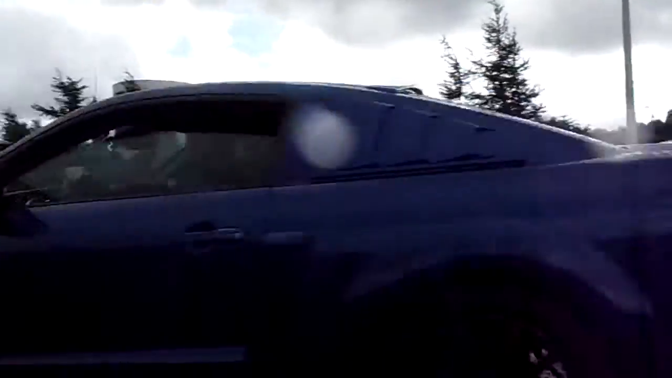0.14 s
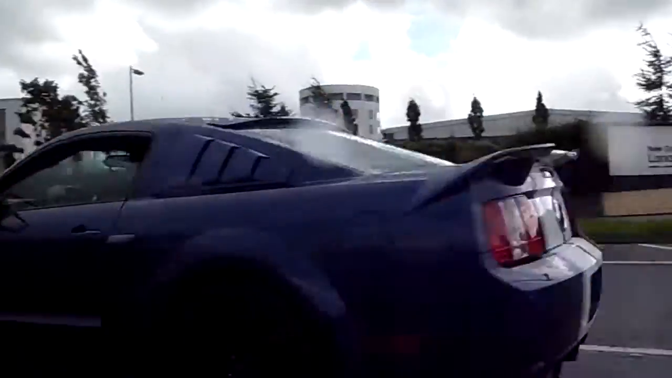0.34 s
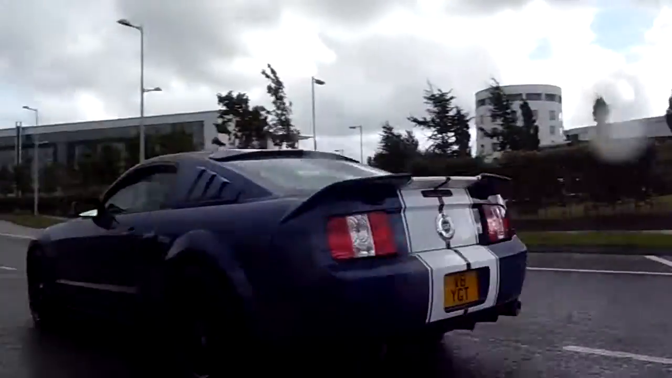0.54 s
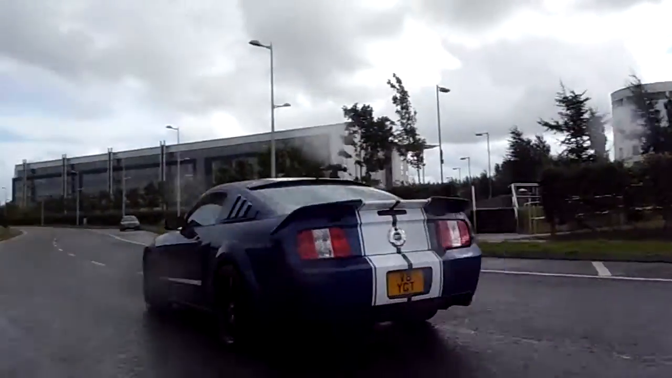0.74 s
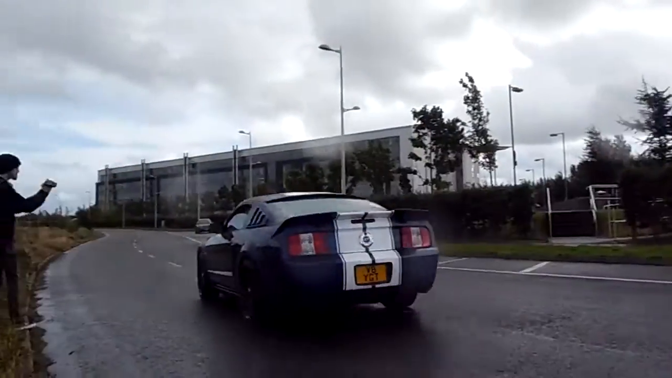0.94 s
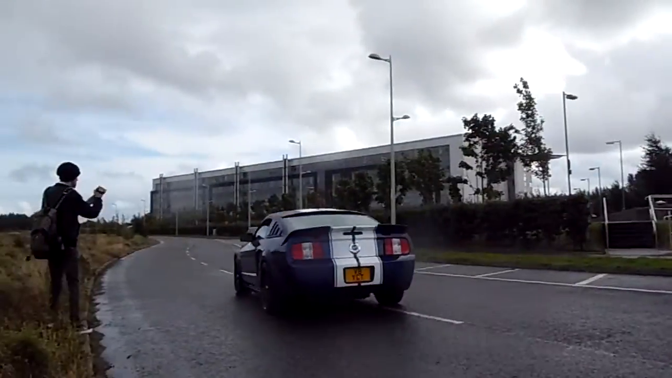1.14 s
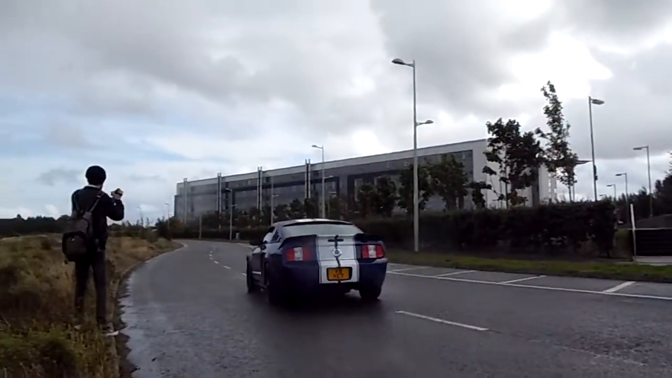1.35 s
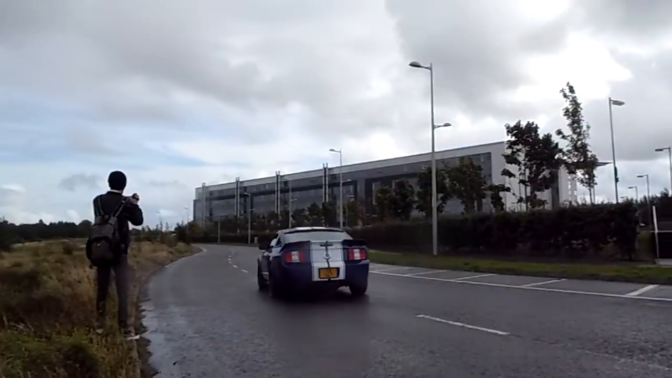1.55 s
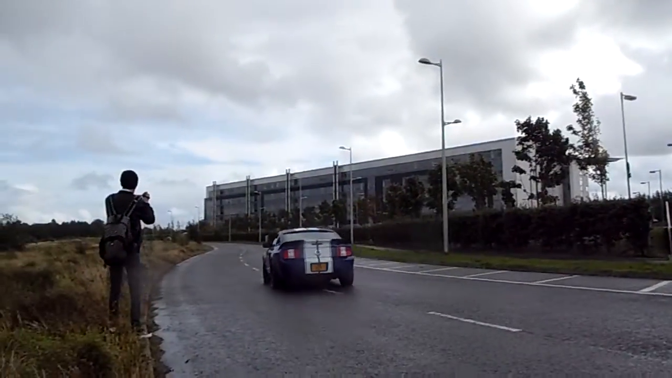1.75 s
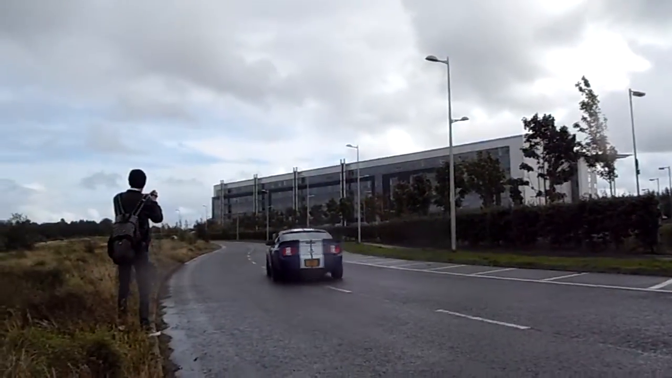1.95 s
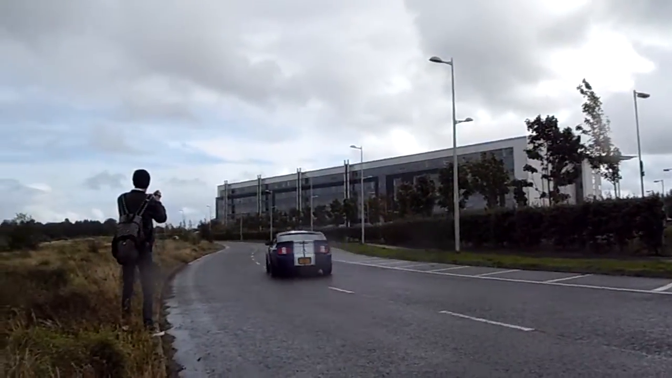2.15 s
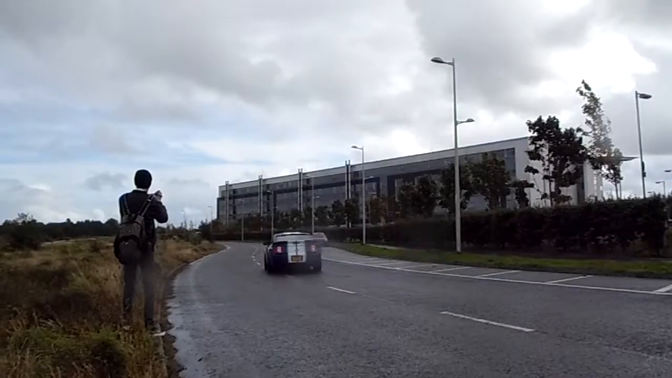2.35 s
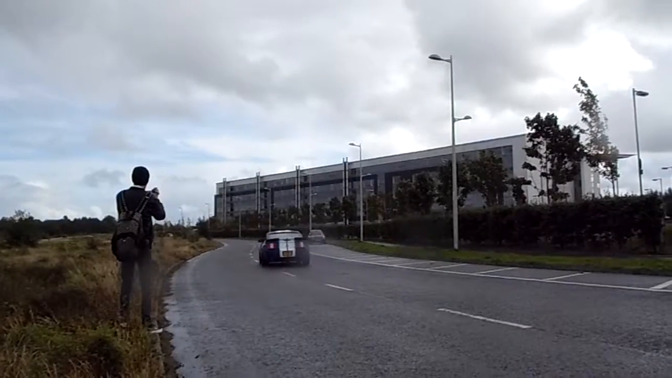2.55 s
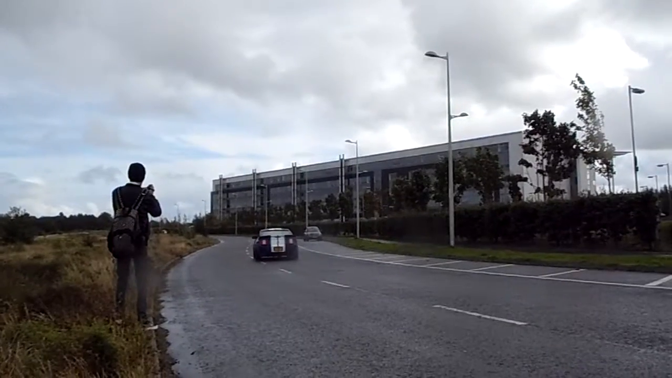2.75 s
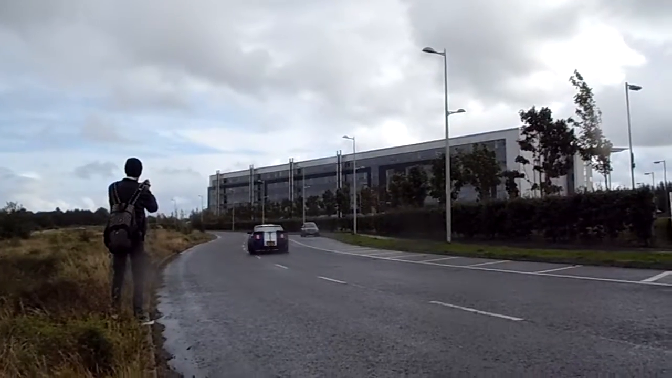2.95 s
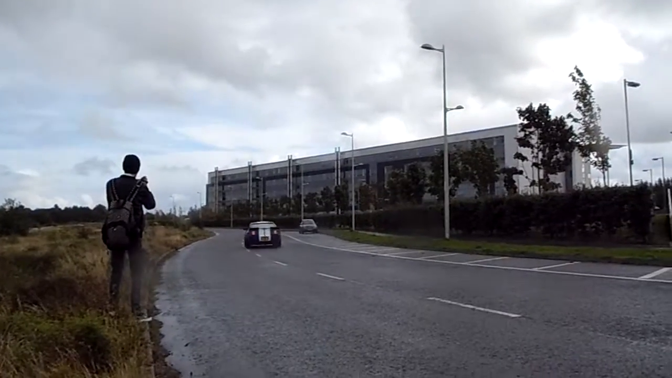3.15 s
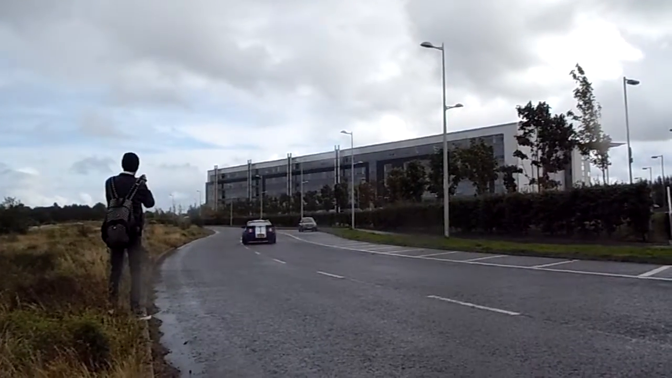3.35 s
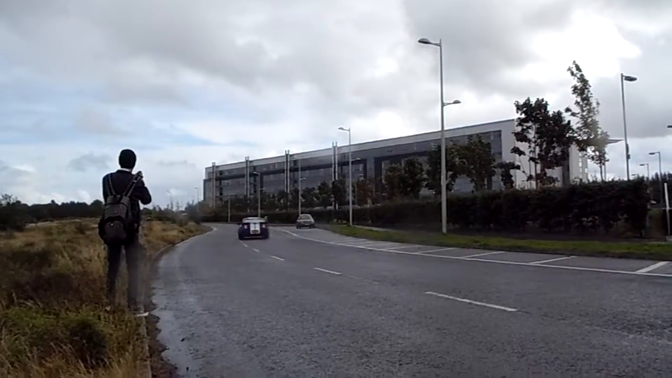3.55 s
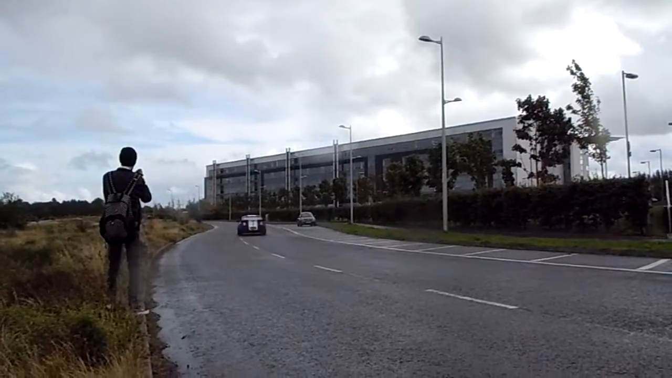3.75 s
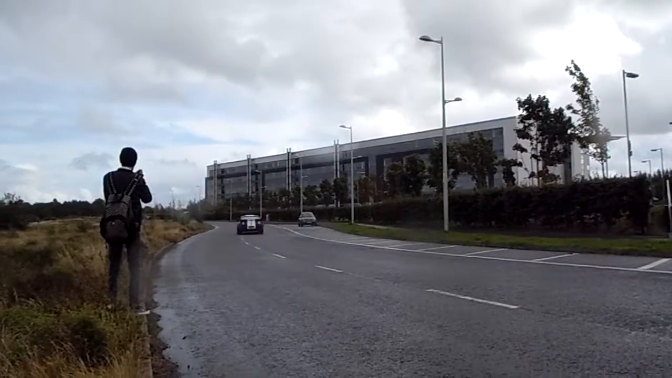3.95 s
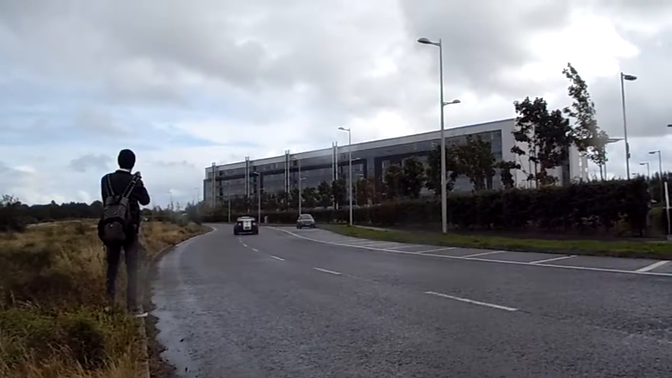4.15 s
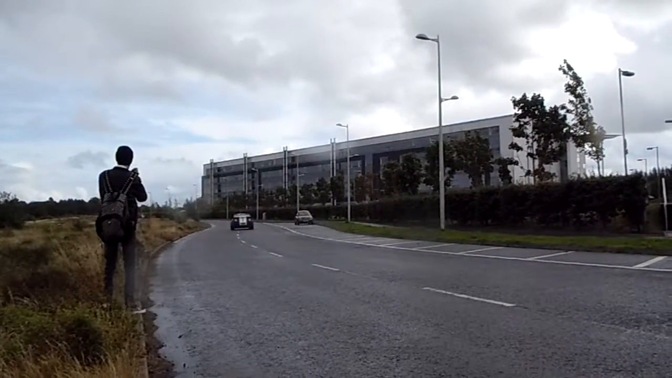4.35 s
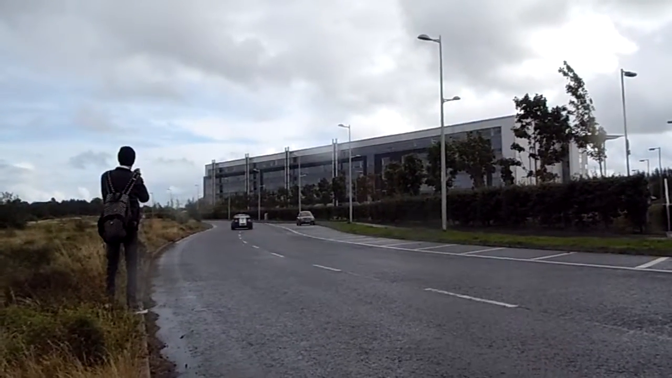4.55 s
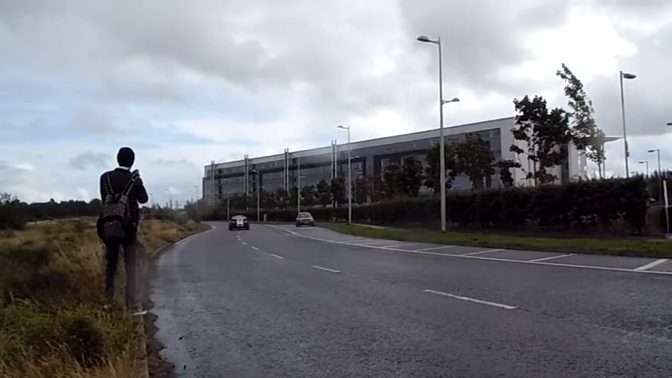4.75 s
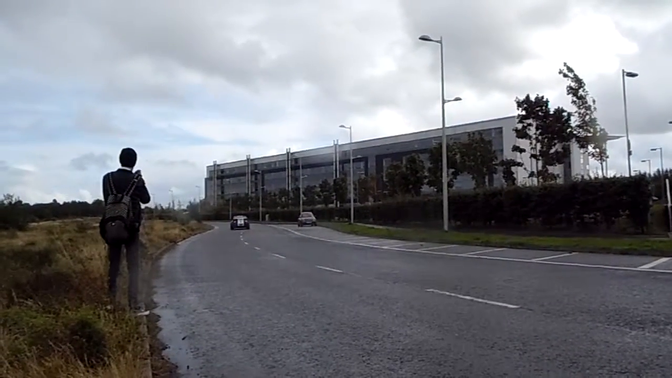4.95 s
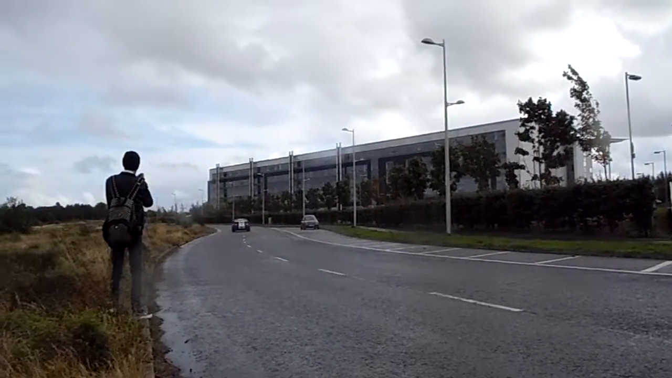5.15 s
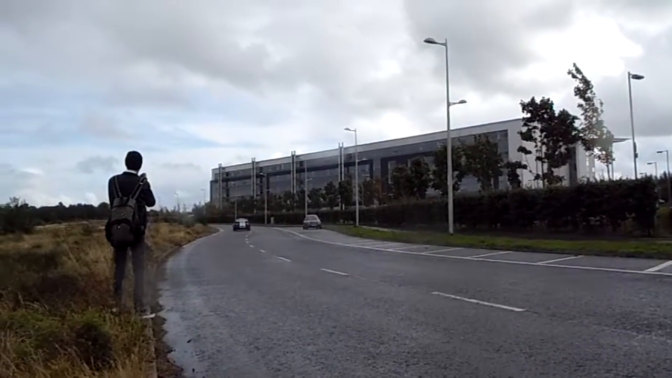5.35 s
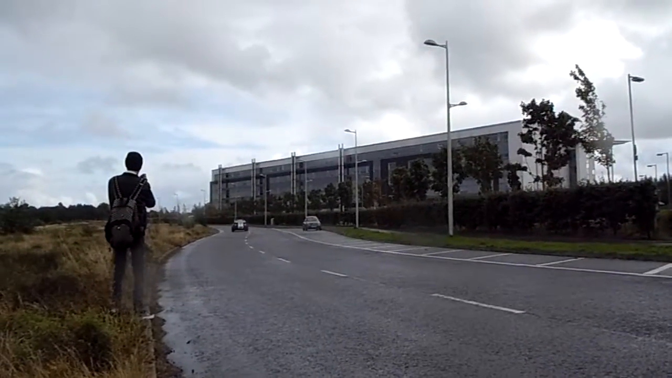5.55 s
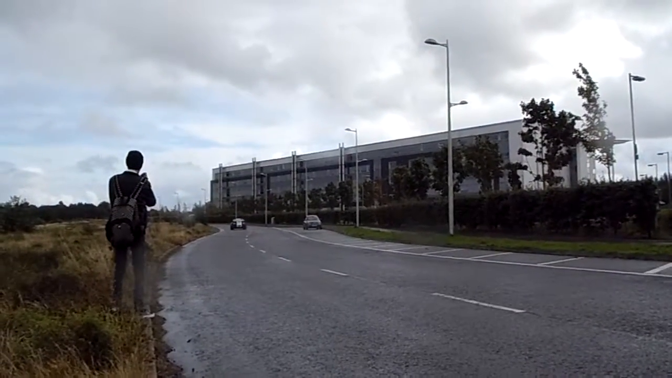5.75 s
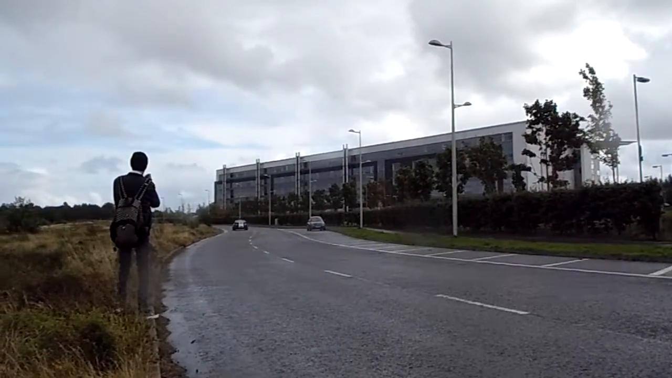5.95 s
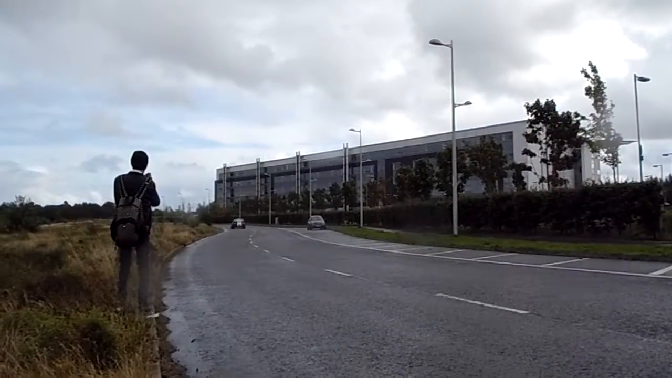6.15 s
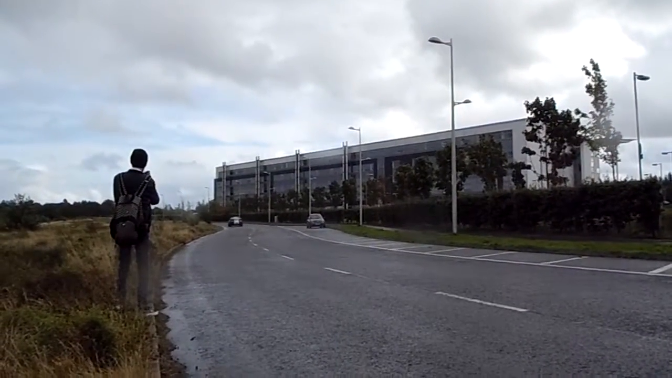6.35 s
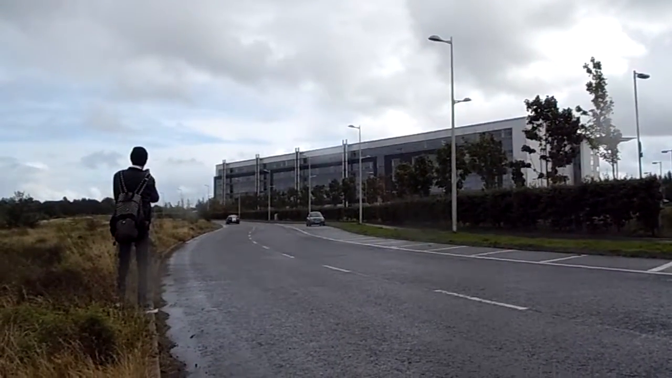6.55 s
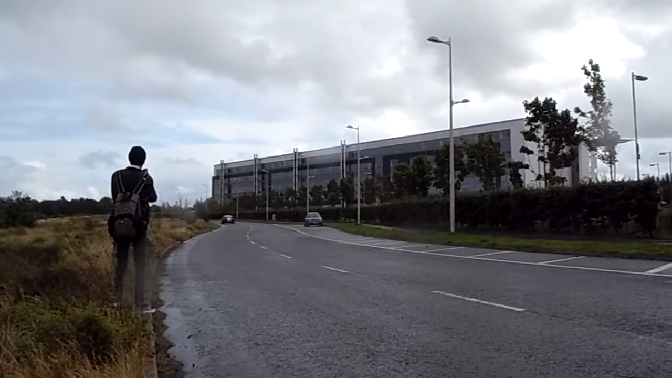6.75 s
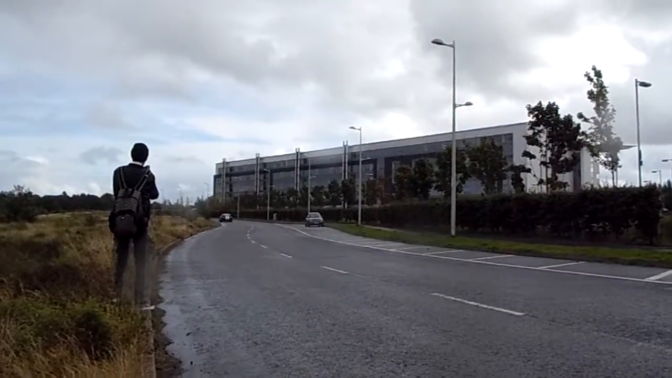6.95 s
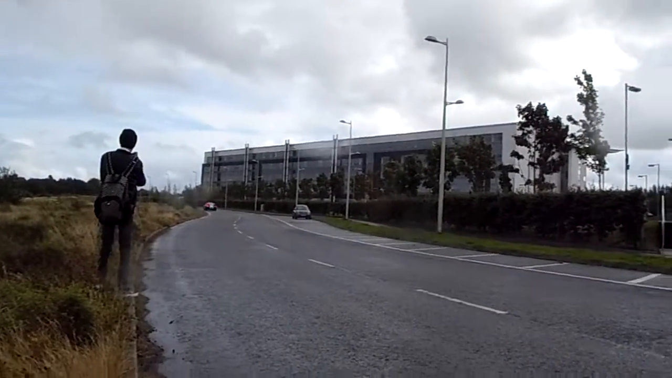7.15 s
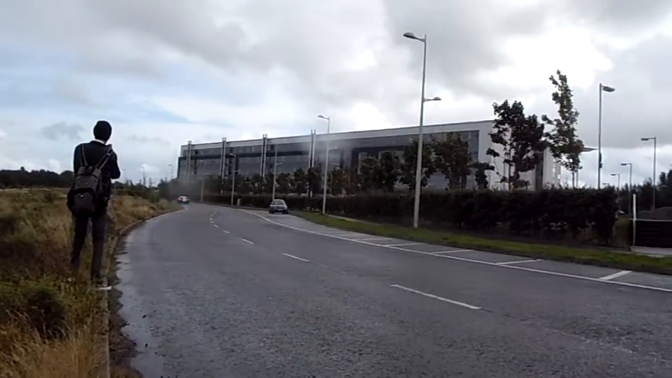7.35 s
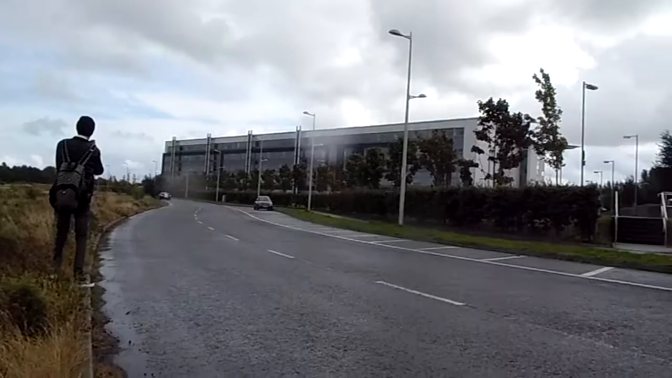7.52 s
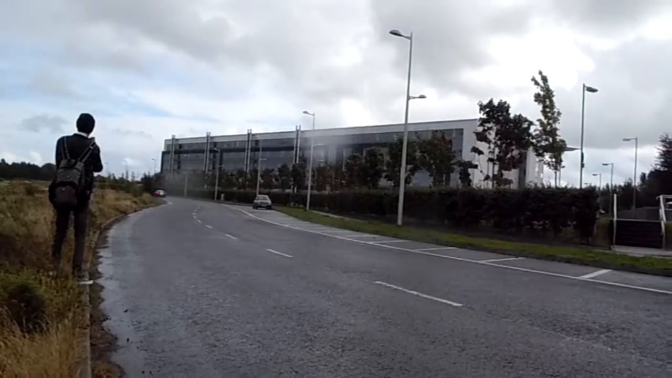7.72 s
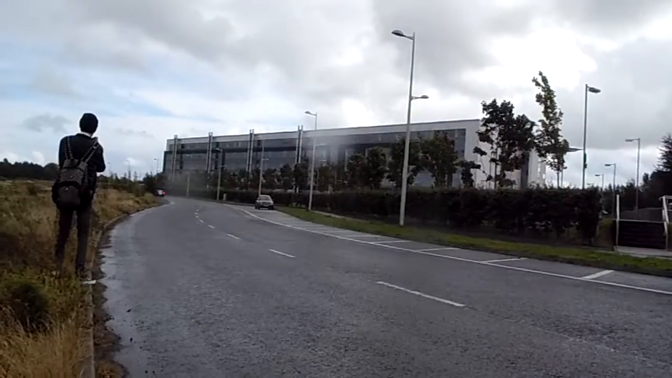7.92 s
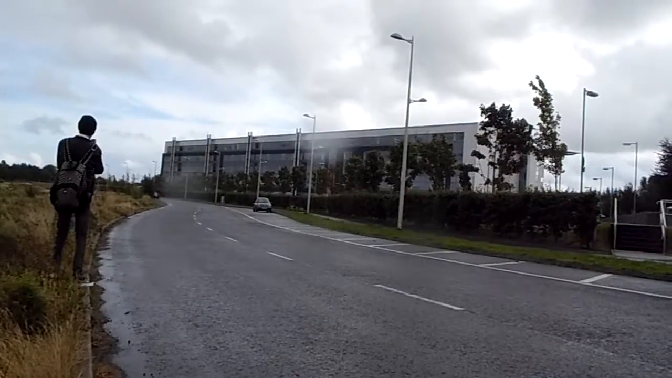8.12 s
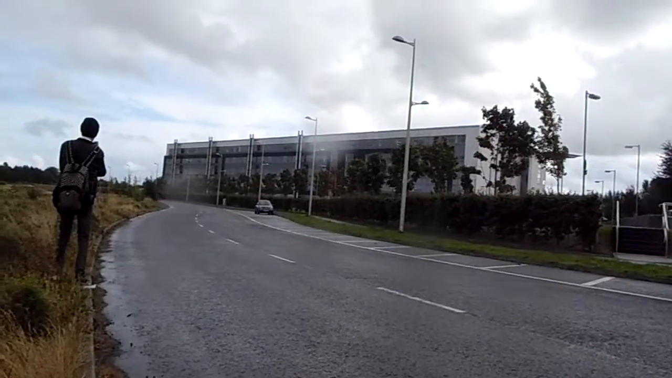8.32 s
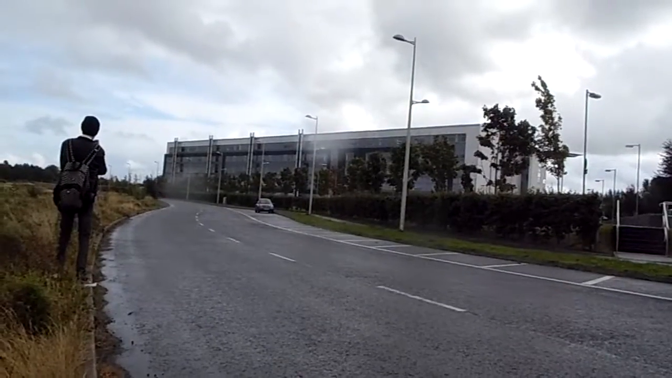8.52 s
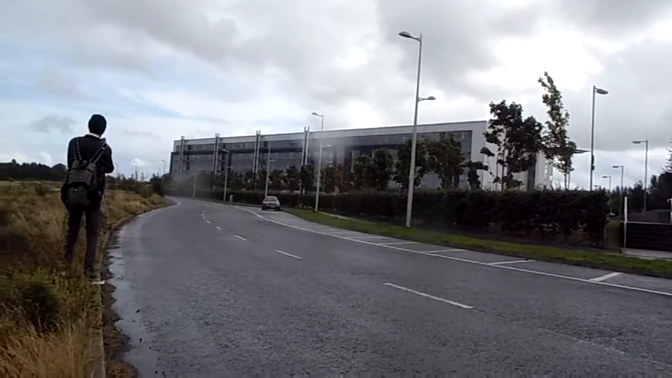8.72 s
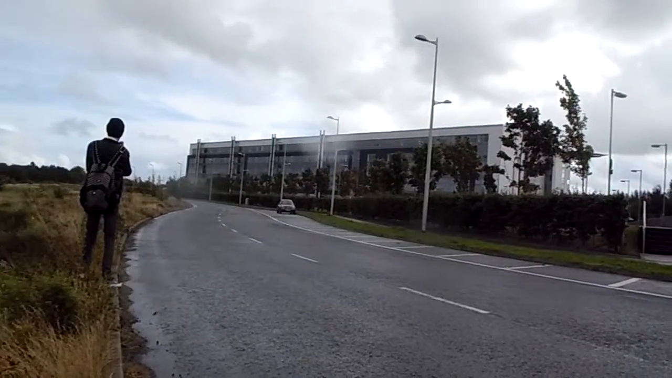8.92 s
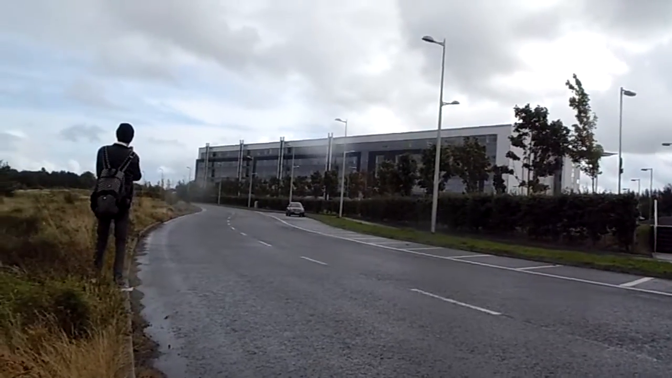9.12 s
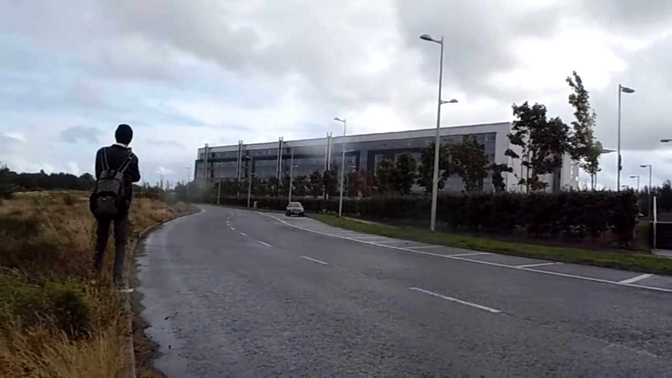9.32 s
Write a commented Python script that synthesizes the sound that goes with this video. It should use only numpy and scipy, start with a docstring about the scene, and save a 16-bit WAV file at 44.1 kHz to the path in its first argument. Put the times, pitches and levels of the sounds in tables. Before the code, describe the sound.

A V8 car roars away on a wet road, revs climbing, then lifts off with crackling pops, accelerates again and fades into the distance.

```python
"""You first hear a V8 car pull away hard on a wet open road, with wind rumbling on a small microphone.
It shifts gear, lifts off and crackles on the overrun far away. Eight uneven exhaust pulses a cycle ring
the pipes and spit hiss. Sliding tones add the firing note and booms; filtered noise makes the
wind, the road spray and the hum of far traffic. Dull echoes follow the car, and the input overloads."""
import sys
import numpy as np
from scipy import signal
from scipy.io import wavfile
from scipy.ndimage import uniform_filter1d

SR = 44100
rng = np.random.default_rng(int(sys.argv[2]) if len(sys.argv) > 2 else 0)


def wav_record(signal):
    """Record a signal, one row per channel, as 16-bit PCM in the file named by sys.argv[1]."""
    frames = np.transpose(np.atleast_2d(signal))
    bounded = np.clip(frames, -1, 1)
    # unit amplitude maps onto the largest positive 16-bit level
    quanta = np.round(bounded * 32767).astype(np.int16)
    wavfile.write(sys.argv[1], SR, quanta)


N = 418064   # length of the scene in samples


def from_db(db):
    """Turn decibels into a gain."""
    return 10 ** (np.asarray(db) / 20)


def noise():
    """Plain white noise, as long as the scene."""
    return rng.standard_normal(N)


def rms_one(x):
    """Scale a sound so its average (rms) level is 1."""
    return x / np.sqrt(np.mean(x ** 2) + 1e-20)


def evened(x):
    """Hold the level at rms 1, averaged over a fifth of a second."""
    return x / np.sqrt(uniform_filter1d(x ** 2, size=SR // 5) + 1e-12)


def in_time(rows):
    """Draw straight lines between table rows: one curve a column, one value a sample."""
    times, *columns = np.transpose(rows)
    return [np.interp(np.arange(N) / SR, times, column) for column in columns]


def swell(middle_s, length_s):
    """A bell-shaped rise and fall in time, with height 1."""
    return np.exp(-4 * ((np.arange(N) / SR - middle_s) / length_s) ** 2)


def band(x, low_hz, high_hz):
    """Keep the sound between two frequencies, with soft edges."""
    return signal.sosfilt(signal.butter(2, [low_hz, high_hz], "band", fs=SR, output="sos"), x)


def resonate(x, modes):
    """Ring several resonances side by side; every second one is upside down."""
    out = 0
    for k, (hz, width_hz, db) in enumerate(modes):
        r = np.exp(-np.pi * width_hz / SR)   # a wider resonance dies sooner
        top = (-1) ** k * from_db(db) * (1 - r * r) / 2
        ring = [1, -2 * r * np.cos(2 * np.pi * hz / SR), r * r]
        out = out + signal.lfilter([top, 0, -top], ring, x + 1e-18)
    return out


def puff(clicks, decay_s):
    """Each click lets out a burst of turbulent gas that dies quickly."""
    return signal.lfilter([1], [1, -np.exp(-1 / (decay_s * SR))], clicks + 1e-18) * noise()


# How fast the engine turns: (time [s], speed [engine cycles per s])
REVS = [(0, 18.71), (0.48, 19.97), (0.96, 22), (1.08, 22.47), (1.32, 24.98), (1.68, 27.67), (1.92, 30.02),
        (2.4, 34.11), (2.88, 37.92), (3.36, 41.09), (3.6, 42.32), (3.84, 43.29), (3.96, 42.92),
        (4.2, 40.09), (4.44, 37.37), (4.68, 35.19), (4.8, 32.66), (4.92, 29), (5.04, 26.91), (5.4, 28.28),
        (6, 30.31), (6.48, 31.2), (6.78, 31.3), (7.08, 30.6), (7.68, 26.21), (8.16, 22.02), (8.4, 20.18),
        (8.64, 19.67), (9.48, 19.28)]


def crank():
    """Add up the speed to get the engine cycles turned so far."""
    return np.cumsum(in_time(REVS)[0]) / SR


FIRING_ORDER = 8   # firings a cycle
STEADY_DB, RAGGED_DB = 1.3, 4.3   # firing-to-firing scatter on and off the throttle
THROTTLE_S = 0.1   # time to change between the two
LATE_MS_PER_DB = 0.07   # a third scatter moves each firing early or late
# Cylinders in firing order: (pulse level before evening out [dB], delay through its own header [ms])
CYLINDERS = [(0, 0.21), (-2.5, 0.78), (-2.5, 1.655), (4, 0.57), (-5.5, 0.27), (0, 1.748), (-4, 0.38),
             (0, 1.218)]
# Off the throttle: (start time [s], end time [s])
LIFTS = [(3.98, 5.05), (6.82, 9.6)]


def firings(cycles):
    """Cylinders fire in turn, each with its own strength and delay, more ragged off the throttle."""
    fired = np.flatnonzero(np.diff(np.floor(FIRING_ORDER * cycles)))
    pulse_db, delay_ms = np.array(CYLINDERS)[np.arange(len(fired)) % FIRING_ORDER].T
    lifted = sum(np.interp(fired / SR, [a - THROTTLE_S, a, b, b + THROTTLE_S], [0, 1, 1, 0])
                 for a, b in LIFTS)
    scatter_db = STEADY_DB + (RAGGED_DB - STEADY_DB) * lifted
    luck = scatter_db[:, None] * rng.standard_normal((len(fired), 3))
    delay_ms = delay_ms + LATE_MS_PER_DB * luck[:, 2]
    at = np.clip(fired + (delay_ms * SR / 1000).astype(int), 0, N - 1)
    pulses, spits = np.zeros((2, N))
    pulses[at] = from_db(pulse_db + luck[:, 0])
    spits[at] = from_db(0.96 * pulse_db + luck[:, 1])   # the hiss has a scatter of its own
    return pulses, spits


# An order (multiple) of the cycle rate booms while it crosses a pipe resonance:
# (middle time [s], order [times the cycle rate], length [s], rms level at the middle [dB])
BOOMS = [(0.048, 11.0, 0.1, -2), (0.202, 10.0, 0.53, -6.5), (0.293, 12.0, 0.78, -6), (.36, 14.0, 0.53, 5),
         (0.504, 20.0, 0.63, -6.5), (0.598, 5.0, 0.53, -5.5), (0.601, 6.0, 0.75, -10),
         (.85, 16.0, 0.31, 12), (1.301, 11.0, 0.18, 10), (1.307, 13.0, 0.18, 2.5), (1.393, 9.0, 0.39, 1),
         (1.722, 11.0, 0.3, 6), (1.747, 6.0, 0.38, 5), (1.85, 14.0, .4, -1), (2.403, 13.0, 0.59, -9),
         (2.852, 16.0, 1.07, -4), (3.003, 12.0, 0.28, -15), (3.342, 23.0, 0.31, -16),
         (3.354, 24.0, 0.37, -10.5), (3.5, 5.0, 0.52, -12.5), (3.602, 14.0, 0.57, -12),
         (3.694, 6.0, 0.62, -2.5), (3.88, 10.0, 0.25, -10), (4.291, 3.0, 0.59, -11),
         (4.293, 6.0, 0.36, -11.5), (4.304, 10.0, 0.21, -11), (4.695, 6.0, 0.19, -14.5),
         (5.024, 16.0, 0.27, -10.5), (5.3, 6.0, 0.42, -12.5), (5.344, 14.0, 0.33, -7),
         (5.652, 14.0, 1.03, -7), (6.186, 16.0, 0.91, -11.5), (6.297, 20.0, 1.1, -17),
         (6.3, 35.0, 0.86, -13), (6.983, 15.0, 0.18, -17.5), (7.104, 13.0, 0.36, -24.5),
         (7.742, 6.0, 0.36, -22.5), (9.1, 6.0, 2, -24.5)]


def tones(cycles, firing_db):
    """The firing note, rising and falling in pitch and level, and booms that swell and fade."""
    out = from_db(firing_db) * np.sin(2 * np.pi * FIRING_ORDER * cycles)
    for middle_s, order, length_s, db in BOOMS:
        tone = np.sin(2 * np.pi * round(order) * cycles)
        out += from_db(db) * swell(middle_s, length_s) * tone
    return np.sqrt(2) * out   # a sine needs this to reach its rms level


PULSE_TOP_HZ = 1630   # gas pulses are blunt
# Exhaust pipe resonances: (frequency [Hz], width [Hz], level before evening out [dB])
PIPES = [(112, 133, -1.5), (180.7, 40.7, 5), (239, 55, 6.5), (330.6, 44, 7), (417.6, 47, 4.5),
         (574, 477, -9)]
# Silencer resonances: (frequency [Hz], width [Hz], level before evening out [dB])
SILENCER = [(473, 290, -1.5), (699, 152, 5.5), (962.4, 90, 7), (1394, 223, 4)]


def burble_and_bark(pulses, burble_db, bark_db):
    """Blunt gas pulses ring the pipes as a burble and the silencer as a bark."""
    pulses = band(pulses, 120.4, PULSE_TOP_HZ)
    burble = from_db(burble_db) * evened(resonate(pulses, PIPES))
    bark = from_db(bark_db) * evened(resonate(pulses, SILENCER))
    return burble + bark


AIR_TOP_HZ = 8020   # distance dulls the jet
DULL_DB, DULL_PER_RASP = -1, 0.78   # the jet's lower modes swing less than the upper
SIZZLE, SIZZLE_FROM_DB = 0.014, -38   # top-octave share for each dB of rasp above a threshold
# The air takes the top off a faint, far rasp
DULLED_HZ, CLEAR_FROM_DB, DULL_FROM_DB = 6500, -16, -38
# Tailpipe jet, lower modes: (frequency [Hz], width [Hz], level before evening out [dB])
DULL_RASP = [(1800, 1370, 6), (3300, 270, 0)]
# Tailpipe jet, upper modes: (frequency [Hz], width [Hz], level before evening out [dB])
BRIGHT_RASP = [(4500, 1400, 5.3), (5440, 1100, 6.5), (8150, 9700, 3.5)]


def rasp(spits, bright_db):
    """Gas spat at each firing, plus a steady rush, makes the tailpipe jet hiss and ring."""
    jet = puff(spits, 0.0032) + 0.61 * noise()
    dull_db = DULL_DB + DULL_PER_RASP * bright_db
    dull = from_db(dull_db) * evened(band(resonate(jet, DULL_RASP), 1430, 3370))
    # a hard-driven jet reaches higher
    sizzle = SIZZLE * np.clip(bright_db - SIZZLE_FROM_DB, 0, None) * band(jet, 10200, 12300)
    bright = band(resonate(jet, BRIGHT_RASP), 2640, AIR_TOP_HZ) + sizzle
    bright = from_db(bright_db) * evened(bright)
    clear = np.interp(bright_db, [DULL_FROM_DB, CLEAR_FROM_DB], [0, 1])
    bright = clear * bright + (1 - clear) * band(bright, 1700, DULLED_HZ)
    return dull + bright


# Throttle and nearness as heard:
# (time [s], burble level [dB], bark level [dB], rasp level [dB], firing tone rms level [dB])
ENGINE = [(0, -3, -35, -23.5, -10), (.5, 6.5, -17, -12.5, -6), (.75, -1, -16, -4, 6), (1.1, 10, 7.5, 2, 14),
          (1.3, 7.5, -4, -7, 9.5), (1.8, 1.5, -2, -5, 5.5), (2.2, 1.5, -7.5, -15, 2),
          (2.8, 1.5, -11, -13, 4), (3.3, -3.5, -8.5, -18.5, 1), (3.83, -9, -6.5, -18, -6),
          (4, -5, -13.5, -29, -4.5), (4.06, -12, -11, -23, -12), (4.54, -6, -10.5, -22, -26),
          (4.6, -13, -18.5, -33.5, -36), (4.83, -12.5, -20.5, -40, -17), (5.05, -7, -12, -22.5, -4),
          (5.25, -7.5, -4, -11.5, -20), (5.76, -8.5, -9.5, -13.5, -17), (6.42, -6.5, -4.5, -21, 0.5),
          (6.8, -10, -13, -26, -10), (6.85, -17.5, -19.5, -43, -41), (7.15, -16, -17.5, -39.5, -59),
          (7.3, -25, -21, -47, -55), (7.7, -17.5, -22.5, -35, -27), (7.95, -22, -26, -43.5, -27),
          (8.24, -29.5, -35.5, -47.5, -39), (9, -25, -58, -51.5, -29.5), (9.48, -32.5, -66, -62, -38)]


def engine():
    """Firing pulses ring the pipes, strong orders stand out as tones, each firing spits hiss."""
    burble_db, bark_db, rasp_db, firing_db = in_time(ENGINE)
    cycles = crank()
    pulses, spits = firings(cycles)
    exhaust = burble_and_bark(pulses, burble_db, bark_db)
    return tones(cycles, firing_db) + exhaust + rasp(spits, rasp_db)


# Wind rumble: (time [s], level [dB])
WIND = [(0, -8), (.76, 4), (1.05, -3), (1.48, -1.5), (2.3, -3), (3.1, -14.5), (3.6, -23.5), (4.6, -16.5),
        (5, -23), (5.4, -17), (5.8, -29), (7.3, -25.5), (7.9, -33), (8.6, -28), (9.48, -25.5)]


def wind():
    """Slightly lumpy low noise: air rumbling on the microphone port."""
    gusts = from_db(0.62 * rms_one(band(noise(), 1.4, 8.7)))
    rumble = band(band(noise(), 25.6, 151), 24, 227)
    return from_db(in_time(WIND)[0]) * rms_one(gusts * rumble)


def traffic_hum():
    """Far traffic is a steady band of low noise."""
    return from_db(-31) * rms_one(band(noise(), 92, 560))


def microphone_hiss():
    """The microphone's own faint white noise."""
    return from_db(-60) * noise()


SPRAY_REACH_HZ = 466   # the hiss reaches this far to each side of its centre
# Tyres throw spray off the wet road: (time [s], centre frequency [Hz], level [dB])
SPRAY = [(0, 1424, -37), (.35, 1436, -8), (.55, 1506, 2), (.75, 1585, -6), (.9, 3024, -8), (1.2, 3777, 3.5),
         (1.4, 3695, -3.5), (1.6, 3420, -41), (2, 3280, -60)]


def spray():
    """A band of hiss whose centre slides as the wheels go by: slow noise carried on a moving tone."""
    centre_hz, db = in_time(SPRAY)
    slow = band(rng.standard_normal((2, N)), 18.0, SPRAY_REACH_HZ)
    turn = 2 * np.pi * np.cumsum(centre_hz) / SR
    return from_db(db) * rms_one(slow[0] * np.cos(turn) + slow[1] * np.sin(turn))


CRACKLES_PER_CYCLE, CRACKLE_SPREAD_DB, CRACKLE_SPREAD_S = 3, 6, 0.002
# Single pops of unburnt fuel at set times, levels before the final mix:
# (time [s], dull crack level [dB], bright crack level [dB])
POPS = [(4.0407, 6, -11), (4.0647, 13, -19), (4.0894, 10, -9), (4.1067, 10, -11), (4.1135, 11, -18),
        (4.2058, 0, -3), (4.284, -7, -4), (4.413, 0, -4), (4.44, -13, -11), (4.477, 1, -5),
        (4.5102, -6, -5), (4.531, -5, 1), (7.0994, -7, -23), (7.199, -18, -24.5), (7.348, -20, -21),
        (7.5955, -3, -15), (7.64, -9, -25), (7.6791, -2, -24), (7.73, 3, -27), (7.7674, 8.5, -15),
        (7.794, -3, -27), (7.916, -1, -25), (8.3795, -23, -47), (8.8094, -32, -48), (8.858, -26, -42),
        (9.0627, -36, -37), (9.1155, -41, -34)]
# Denser crackle of pops near steps of the crank, typical levels before the final mix:
# (start time [s], end time [s], dull crack level [dB], bright crack level [dB])
CRACKLE = [(4.055, 4.55, -10, -15.5), (7.0, 8.048, -22.5, -38.5)]
# A pop rings the first mode dull, the others bright:
# (frequency [Hz], width [Hz], level before the final mix [dB])
CRACK = [(2980, 1140, 1.2), (5130, 3100, 5.5), (7900, 3800, -16)]


def pops():
    """Each pop is a dull and a bright crack of hiss on top of a push through the pipes."""
    steps_s = np.flatnonzero(np.diff(np.floor(CRACKLES_PER_CYCLE * crank()))) / SR
    spread = [CRACKLE_SPREAD_S, CRACKLE_SPREAD_DB, CRACKLE_SPREAD_DB]
    luck = rng.standard_normal((len(steps_s), 3)) * spread
    crackle = [luck[k] + [s, dull_db, bright_db]
               for start_s, end_s, dull_db, bright_db in CRACKLE
               for k, s in enumerate(steps_s) if start_s < s < end_s]
    times, dull_db, bright_db = np.transpose(np.vstack([crackle, POPS]))
    at = (times * SR).astype(int)
    dull, bright = np.zeros((2, N))
    dull[at] = from_db(dull_db)
    bright[at] = from_db(bright_db)
    low_crack = band(resonate(puff(dull, 0.00069), CRACK[:1]), 1600, 4140)
    high_crack = band(resonate(puff(bright, 0.00096), CRACK[1:]), 4200, 9300)
    # the square root makes the push vary less than the crack
    thump = band(band(np.sqrt(dull), 120.0, 870), 30, PULSE_TOP_HZ)
    return 3.2 * low_crack + 2.9 * high_crack + 31 * thump


FLUTTER_DB = 4   # rms swing of the flutter
# Bands of hiss swell in the distance:
# (middle time [s], length [s], level at the middle before flutter [dB], low edge [Hz], high edge [Hz])
FAR_HISS = [(8.6, 0.6, -36, 1600, 3040), (7.25, 0.41, -42.5, 3900, 6200), (8.93, 0.93, -52.5, 4660, 6600)]


def far_hiss():
    """Bands of noise swell and fade, sharing one quick flutter in level."""
    flutter = from_db(FLUTTER_DB * rms_one(band(noise(), 9.5, 49)))
    out = np.zeros(N)
    for middle_s, length_s, db, low_hz, high_hz in FAR_HISS:
        hiss = rms_one(band(band(noise(), low_hz, high_hz), low_hz, high_hz))
        out += from_db(db) * swell(middle_s, length_s) * hiss
    return flutter * out


# Reflections from road, hedge and facade: (delay [s], level [dB])
ECHOES = [(0.022, -14), (0.059, -18), (0.128, -22.5)]


def outdoors(x):
    """Surfaces send back a few delayed, dull copies of the sound."""
    out, dull = x.copy(), band(x, 122, 1980)
    for delay_s, db in ECHOES:
        delay = int(delay_s * SR)
        out[delay:] += from_db(db) * dull[:N - delay]
    return out


def scene():
    """Mix the car and its echoes with wind, far traffic and hiss."""
    car = outdoors(engine() + pops() + spray())
    return (car + wind() + traffic_hum() + far_hiss() + microphone_hiss())[None]


TOP, OFFSET = 0.71, 0.02   # overload ceiling and bias of the input stage
CUTOFF_HZ = 16550   # from here up, the treble is at least 70 dB down


def record(dry):
    """The input stage flattens loud peaks near its ceiling with a hard knee; the top is cut."""
    x = (dry + OFFSET) / TOP
    flat = TOP * x / (1 + np.abs(x) ** 4.5) ** (1 / 4.18)
    return signal.sosfilt(signal.cheby2(22, 70, CUTOFF_HZ, fs=SR, output="sos"), flat)


dry = scene()
out = record(dry)
wav_record(out)
```